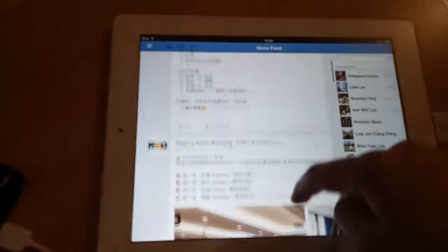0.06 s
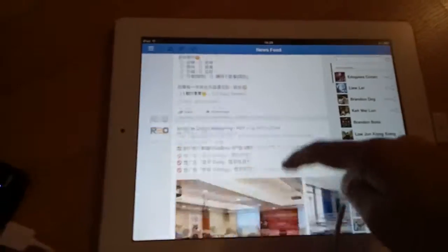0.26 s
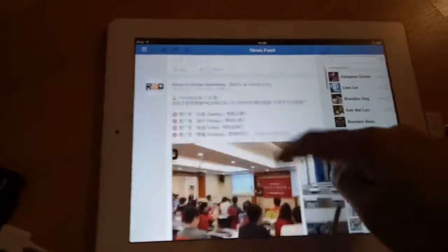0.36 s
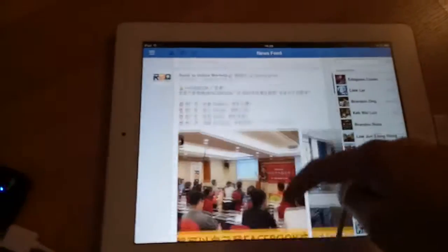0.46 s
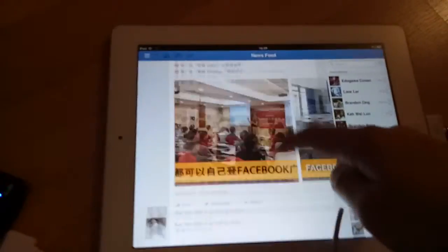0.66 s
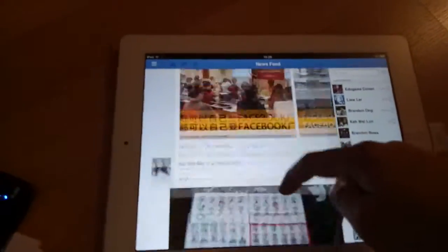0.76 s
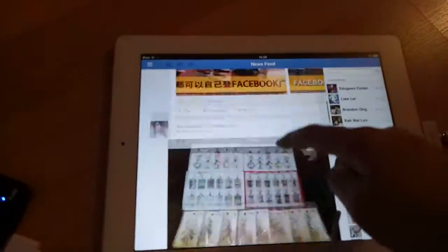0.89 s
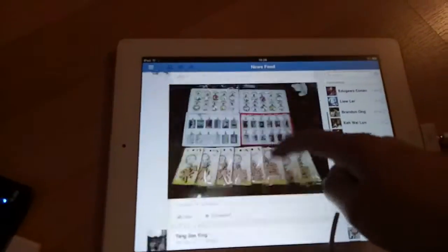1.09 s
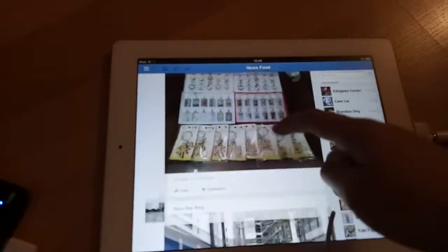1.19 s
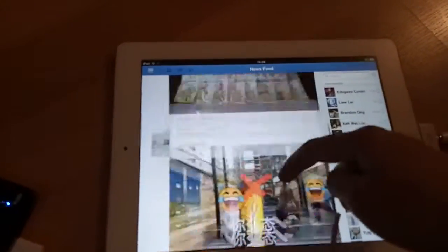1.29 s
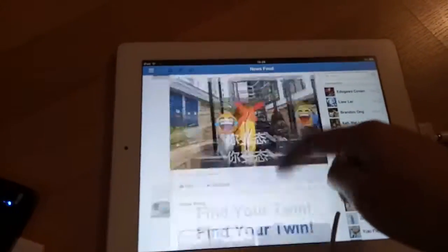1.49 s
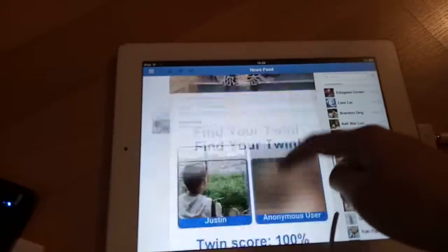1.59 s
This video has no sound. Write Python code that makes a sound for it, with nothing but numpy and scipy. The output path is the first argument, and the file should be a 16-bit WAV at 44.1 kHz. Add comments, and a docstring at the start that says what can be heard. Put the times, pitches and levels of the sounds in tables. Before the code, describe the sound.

A fingertip taps and swipes a tablet screen, landing at about 0.2, 0.6, 0.9 and 1.4 seconds. Each landing is a dull thump with a tiny glassy tick, followed by faint brushing and rubbing of skin. The ticks and brushing sit to the right, while the nearby hand adds soft low bumps and rustling on the left. The last rub fades into a small room's steady low hum.

```python
"""A small quiet room hums, and a hand rustles close to the microphone. At 0.2 s a fingertip lands on a
tablet: the glass gives a tiny tick and the whole tablet a dull thump. The finger then flicks across the
glass, brushing faintly, juddering and rubbing the case. It lands and flicks again near 0.6, 0.9 and 1.4 s,
while the moving hand adds soft low bumps, mostly on the left. The last rub fades into the steady hum."""
import sys
import numpy as np
from scipy import signal
from scipy.fft import rfft, irfft
from scipy.io import wavfile

SR = 44100
rng = np.random.default_rng(int(sys.argv[2]) if len(sys.argv) > 2 else 0)


def master_out(mix):
    """Clip the mix to full scale and print it as 16-bit PCM to the path in sys.argv[1]."""
    frames = np.transpose(np.atleast_2d(mix))
    ceiling = np.clip(frames, -1, 1)
    pcm = np.round(ceiling * 32767).astype(np.int16)
    wavfile.write(sys.argv[1], SR, pcm)


N = 72765
T = np.arange(N) / SR
FREQS_HZ = np.fft.rfftfreq(N, 1 / SR)
GLASS_PAN_DB, CLACK_PAN_DB = -31, -39.5  # both far to the right

# Tone of a hard clack on the tablet: pitch_hz, level_db
CLACK_TONE = [(150, -53.5), (450, -20.5), (950, 3.5), (1350, -12), (1750, -1.5), (2050, 2), (2650, -4.5),
              (3200, -23.5), (7000, -30.5)]


def undb(db):
    """Turn decibels into a number to multiply a sound by."""
    return 10 ** (np.asarray(db) / 20)


def unit(x):
    """Scale a sound so that its average level (rms) is 1."""
    return x / np.sqrt(np.mean(x ** 2))


def pan(x, db):
    """Place a sound by turning down the far side: plus is left, minus is right."""
    return x * undb(np.array([[min(db, 0)], [min(-db, 0)]]))


def click(tone):
    """A click with the given tone (its level at each pitch) and a peak of 1."""
    hz, db = np.array(tone, float).T
    freqs = np.maximum(np.fft.rfftfreq(4096, 1 / SR), 1)
    gains = undb(np.interp(np.log(freqs), np.log(hz), db))
    cepstrum = irfft(np.log(gains))
    # Folding onto the first half packs the energy at the start of the click.
    half = len(cepstrum) // 2
    cepstrum[1:half] *= 2
    cepstrum[half + 1:] = 0
    pulse = irfft(np.exp(rfft(cepstrum)))
    return pulse / np.abs(pulse).max()


def colour(x, tone):
    """Filter a sound to give it a tone."""
    return irfft(rfft(x, N) * rfft(click(tone), N), N)


def cut_treble(x, top_hz):
    """Take away the sound above top_hz."""
    return signal.sosfilt(signal.butter(8, top_hz, fs=SR, output="sos"), x)


def narrow_band(noise, pitch_hz, width_hz):
    """Keep the noise near one pitch, at an average level of 1."""
    return unit(irfft(rfft(noise) / (1 + ((FREQS_HZ - pitch_hz) / width_hz) ** 2), N))


def stereo_noise(shared):
    """Left and right noise; shared runs from 0 (unrelated) to 1 (the same)."""
    return np.sqrt(shared) * rng.standard_normal(N) + np.sqrt(1 - shared) * rng.standard_normal((2, N))


def at(start_s, x):
    """Place a short sound at its time."""
    return np.pad(x, (int(start_s * SR), N))[:N]


def swell(start_s, rise_s, fade_s):
    """A level that rises in a straight line, then dies away."""
    age = T - start_s
    return np.clip(age / rise_s, 0, 1) * np.exp(-np.maximum(age - rise_s, 0) / fade_s)


def thud(start_s, pitch_hz, peak_s, shape):
    """A soft push on something that barely rings: it swells and dies within a few swings."""
    age = np.maximum(T - start_s, 0)
    level = (age / peak_s * np.exp(1 - age / peak_s)) ** shape
    return -level * np.sin(2 * np.pi * pitch_hz * age)


def ring(notes):
    """The notes of a struck object start together; each falls 60 dB in its ring_s."""
    return sum(undb(level_db) * np.sin(2 * np.pi * pitch_hz * T) * np.exp(-np.log(1000) * T / ring_s)
               for pitch_hz, ring_s, level_db in notes)


def room_hum():
    """Steady room noise, its bass stronger on the left, with narrow bands of hum and whine."""
    # Tone of the room noise: pitch_hz, level_db
    room_tone = [(20, -18.5), (75, 1), (150, -3.5), (270, -2.5), (420, -10.5), (580, -17.5), (720, -12),
                 (880, -7.5), (1200, -22.5), (2600, -25.5), (4000, -30.5), (5200, -40), (7000, -43.5),
                 (15000, -45)]
    # Bands of hum and whine: pitch_hz, width_hz, level_db, pan_db
    hum_bands = [(213, 7.4, -77, -9.5), (795.4, 37, -69, -1.5), (2447, 120, -79, -15.5),
                 (4420, 140, -79, -20)]
    bass_share = 1 / (1 + (FREQS_HZ / 830) ** 2)  # below 830 Hz the two sides are mostly alike
    bass = rfft(pan(stereo_noise(shared=0.86), db=9.5)) * np.sqrt(bass_share)
    treble = rfft(stereo_noise(shared=0)) * np.sqrt(1 - bass_share)
    out = undb(-64) * unit(colour(irfft(bass + treble, N), room_tone))
    for pitch_hz, width_hz, level_db, pan_db in hum_bands:
        band = narrow_band(stereo_noise(shared=0.4), pitch_hz, width_hz)
        out += pan(undb(level_db) * band, pan_db)
    return out


def room_echo(x):
    """The room answers a sound with a short, blurred echo."""
    # Tone of the echo: pitch_hz, level_db
    echo_tone = [(60, -2.5), (250, -4.5), (900, 2), (2200, -1.5), (4500, -16.5), (9000, -19)]
    ring_s = 0.22
    tail = stereo_noise(shared=0.58) * swell(start_s=0.0043, rise_s=0.014, fade_s=ring_s / np.log(1000))
    tail /= np.sqrt(np.sum(tail[0] ** 2))
    peak_gain = np.abs(rfft(click(echo_tone))).max()
    tail = colour(tail, echo_tone) / peak_gain
    return undb(-5) * signal.fftconvolve(x, tail, axes=1)[:, :N]


def hand_bumps():
    """The moving hand and the pad of the finger touching down make soft low bumps."""
    # Soft bumps: start_s, pitch_hz, level_db, pan_db
    bumps = [(.193, 300, -43.5, 5.5), (0.2196, 228, -43, -0.5), (0.241, 96, -31.5, 15),
             (0.263, 96, -29.5, 31), (0.2878, 108, -28.5, 40), (0.394, 85.5, -46.5, 9),
             (0.5872, 270, -49.5, -5), (0.657, 78, -43.5, 18.5), (0.709, 74, -38.5, 17),
             (.840, 108, -39, 22), (0.883, 322, -48, 0), (0.92, 184, -41.5, 6), (0.922, 97, -30, 23),
             (0.974, 55, -47.5, 4), (1.4009, 232, -41, 17), (1.41, 198, -41.5, 1)]
    return sum(pan(undb(level_db) * thud(start_s, pitch_hz, peak_s=0.6 / pitch_hz, shape=2.7), pan_db)
               for start_s, pitch_hz, level_db, pan_db in bumps)


def hand_rubbing():
    """The dragging finger and shifting hand stir a low rumble, the body of the case and a soft rustle."""
    # Moves of the hand: start_s, rise_s, fade_s, rumble_db, body_db, rustle_db
    rubs = [(0.019, 0.025, 0.24, -57, -70, -66), (0.178, 0.049, 0.063, -47.5, -46, -59),
            (0.288, 0.02, 0.036, -44.5, -73, -61), (0.602, 0.042, 0.12, -51.5, -51, -71.5),
            (0.729, 0.063, 0.1, -51.5, -55.5, -60), (0.889, 0.029, 0.083, -53.5, -48, -55.5),
            (.96, 0.083, 0.035, -73, -58.5, -63.5), (1.398, 0.018, 0.078, -54.5, -59, -58.5),
            (1.488, 0.023, 0.41, -54.5, -80, -61.5)]
    # Tones of the rumble, the case body and the rustle: pitch_hz, level_db
    rumble_tone = [(20, -24.5), (50, -7.5), (85, 3), (150, 5), (220, -8), (400, -35.5), (1500, -66)]
    body_tone = [(40, -23.5), (130, -10.5), (200, 6), (290, 5), (370, -4), (480, -21.5), (1200, -46),
                 (4000, -68.5)]
    rustle_tone = [(300, -24.5), (580, -24.5), (760, -4), (890, 12), (1060, -6), (1220, -17), (2500, -21.5),
                   (4500, -29.5), (7000, -50.5)]
    power = sum((undb(levels_db)[:, None] * swell(start_s, rise_s, fade_s)) ** 2
                for start_s, rise_s, fade_s, *levels_db in rubs)
    rumble_level, body_level, rustle_level = np.sqrt(power)
    rumble = pan(unit(colour(stereo_noise(shared=0.77), rumble_tone)), db=11)
    body = pan(unit(colour(stereo_noise(shared=0.9), body_tone)), db=6)
    rustle = pan(unit(colour(stereo_noise(shared=0.55), rustle_tone)), db=4.5)
    return rumble_level * rumble + body_level * body + rustle_level * rustle


def skin_juddering():
    """The dragging skin sticks and slips at a loose, wandering rate."""
    # Judders of the skin: start_s, rise_s, fade_s, rate_hz, level_db
    judders = [(0.299, 0.014, 0.075, 133.5, -51.5), (0.641, 0.13, 0.074, 302, -64),
               (0.779, 0.05, 0.056, 147, -53), (0.941, .05, 0.071, 256, -52.5),
               (1.46, 0.11, 0.17, 157, -60)]
    out = 0
    for start_s, rise_s, fade_s, rate_hz, level_db in judders:
        band = narrow_band(rng.standard_normal(N), rate_hz, width_hz=16.4)
        out += undb(level_db) * band * swell(start_s, rise_s, fade_s)
    return pan(out, db=8)


def skin_brushing():
    """Skin sliding on glass makes a dense run of tiny slips of uneven size."""
    # Flicks across the glass: start_s, rise_s, fade_s, level_db
    flicks = [(0.177, 0.013, 0.017, -57.5), (0.281, 0.029, 0.062, -57), (0.601, 0.026, 0.047, -57.5),
              (0.898, 0.033, 0.058, -60.5), (1.19, 0.05, 0.055, -72.5), (1.425, 0.018, 0.044, -66.5),
              (1.47, 0.033, 0.055, -69.5)]
    # Tone of skin on glass: pitch_hz, level_db
    brush_tone = [(500, -16), (1400, -14), (1900, -8.5), (2600, -3.5), (3150, -11), (3950, 1.5), (4700, -2),
                  (5600, -12), (6600, -29), (9000, -46)]
    slips = rng.standard_normal(N)
    size_db = np.repeat(rng.standard_normal(N // 32 + 1), 32)[:N]  # a new size every 32 samples
    hiss = unit(colour(slips * undb(size_db), brush_tone))
    power = sum((undb(level_db) * swell(start_s, rise_s, fade_s)) ** 2
                for start_s, rise_s, fade_s, level_db in flicks)
    return pan(hiss * np.sqrt(power), db=-20)


def glass_tick(top_hz):
    """A very short tick of the glass; a softer touch has a lower top_hz."""
    # Tone of the tick: pitch_hz, level_db
    tick_tone = [(500, -43), (1400, -11), (3200, -38.5), (3800, 5.5), (4400, 5), (5600, -4.5), (6600, -20),
                 (7600, -15), (8800, -60)]
    return cut_treble(click(tick_tone), top_hz)


def skin_catches():
    """The skin catches on the glass: a small tick and clack without a thump."""
    # Light catches: start_s, tick_db, clack_db
    catches = [(0.1833, -51.5, -42.5), (0.1965, -53, -44.5), (0.2834, -36.5, -66), (0.2851, -40.5, -38),
               (0.2899, -43.5, -56.5), (0.3202, -47, -69), (0.6625, -42, -51)]
    out = 0
    for start_s, tick_db, clack_db in catches:
        out += pan(undb(tick_db) * at(start_s, glass_tick(top_hz=5750)), GLASS_PAN_DB)
        out += pan(undb(clack_db) * at(start_s, click(CLACK_TONE)), CLACK_PAN_DB)
    return out


def tablet_thump(start_s, pitch_hz):
    """The whole tablet gives under the finger in a short thump that carries no deep bass."""
    push = thud(start_s, pitch_hz, peak_s=0.0043, shape=3.14)
    bass_cut = signal.butter(2, 80, "high", fs=SR, output="sos")
    return signal.sosfiltfilt(bass_cut, push)


def finger_taps():
    """Each landing thumps the tablet, ticks the glass and rings the case, with a clack and a knock."""
    # Landings: start_s, thump_hz, thump_db, tick_db, tick_top_hz, case_db, clack_db, knock_db, glass_db
    taps = [(.2000, 196, -22, -33, 6900, -44.5, -32.5, -33.5, -48),
            (0.5927, 191.4, -25.5, -29.5, 6140, -41.5, -67, -51.5, -56.5),
            (0.8861, 196, -28, -31, 8900, -36.5, -55.5, -61, -54),
            (1.416, 225.4, -27, -31, 5500, -42, -48.5, -48, -45)]
    # Ringing notes of the glass, the case and the hollow knock: pitch_hz, ring_s, level_db
    glass_notes = [(2520, 0.024, 0.92)]
    case_notes = [(852, 0.039, -1), (955, 0.037, -13)]
    knock_notes = [(590, 0.022, -2.5), (742, 0.022, -1)]
    out = 0
    for start_s, thump_hz, thump_db, tick_db, tick_top_hz, case_db, clack_db, knock_db, glass_db in taps:
        out += pan(undb(thump_db) * tablet_thump(start_s, thump_hz), db=5.5)
        out += pan(undb(tick_db) * at(start_s, glass_tick(tick_top_hz)), GLASS_PAN_DB)
        out += pan(undb(glass_db) * at(start_s, ring(glass_notes)), GLASS_PAN_DB)
        out += pan(undb(case_db) * at(start_s, ring(case_notes)), db=5.5)
        out += pan(undb(clack_db) * at(start_s, click(CLACK_TONE)), CLACK_PAN_DB)
        out += pan(undb(knock_db) * at(start_s, ring(knock_notes)), db=2.5)
    return out


def scene():
    """Taps and flicks in the room; soft skin leaves the hits no high treble."""
    hits = cut_treble(finger_taps() + skin_catches(), top_hz=8400)
    echo = room_echo(hits)
    sliding = skin_brushing() + hand_rubbing() + skin_juddering()
    return hits + echo + sliding + hand_bumps() + room_hum()


def record(dry):
    """The recorder cuts the treble above 15400 Hz."""
    return signal.sosfilt(signal.ellip(8, 0.2, 70, 15400, fs=SR, output="sos"), dry)


dry = scene()
out = record(dry)
master_out(out)
```